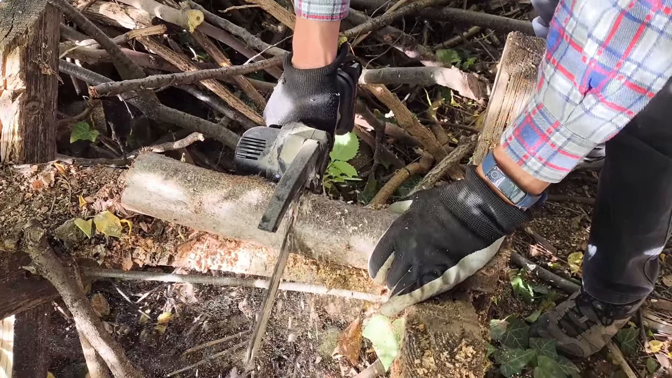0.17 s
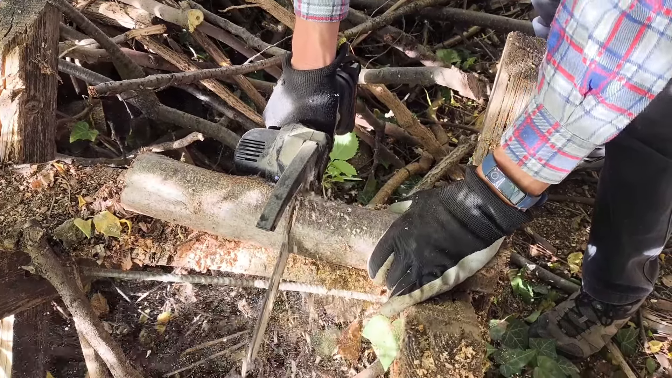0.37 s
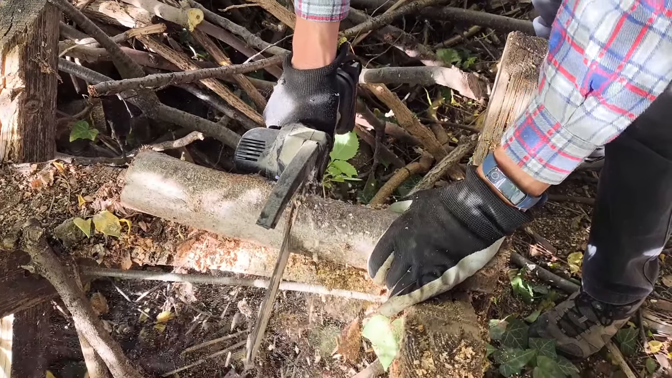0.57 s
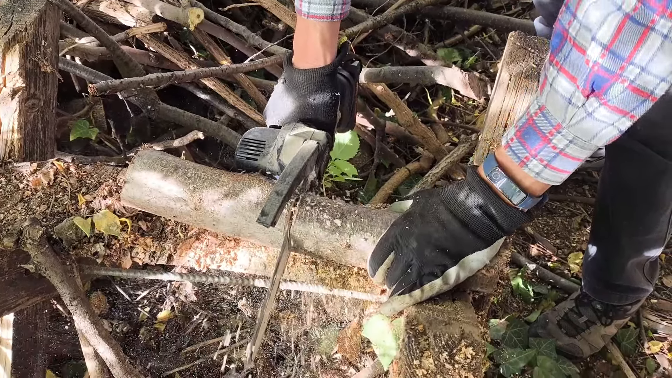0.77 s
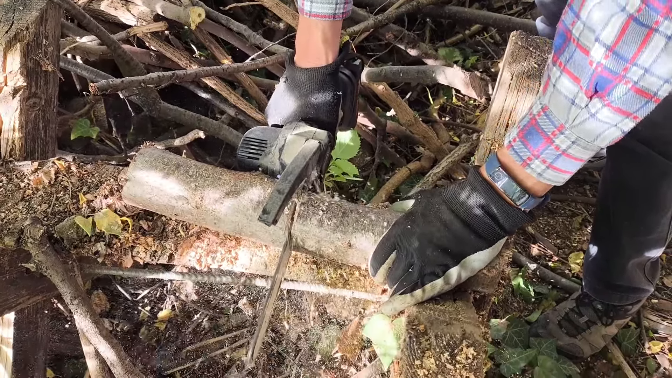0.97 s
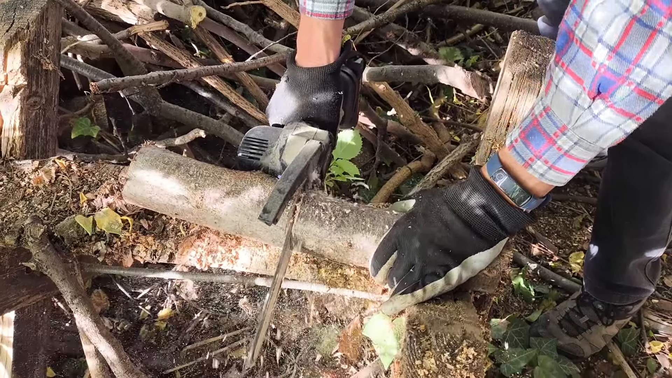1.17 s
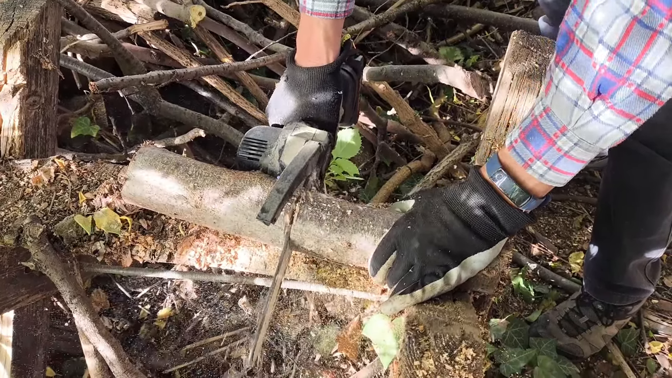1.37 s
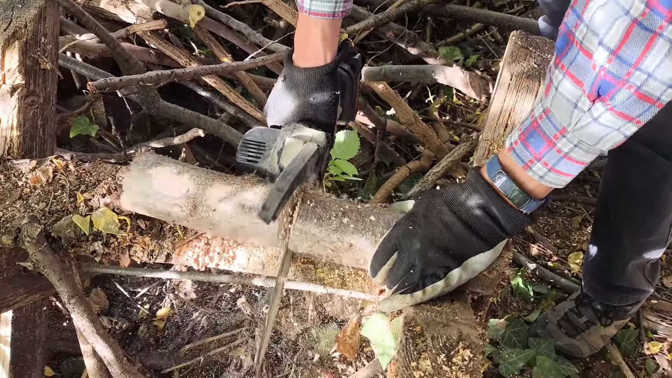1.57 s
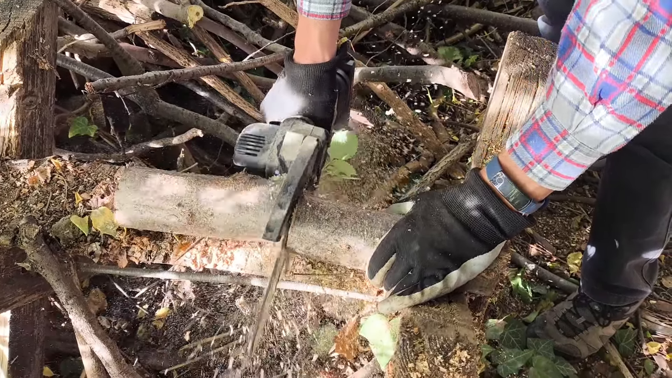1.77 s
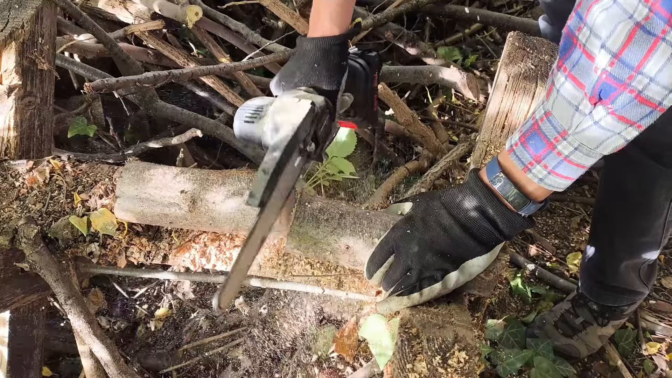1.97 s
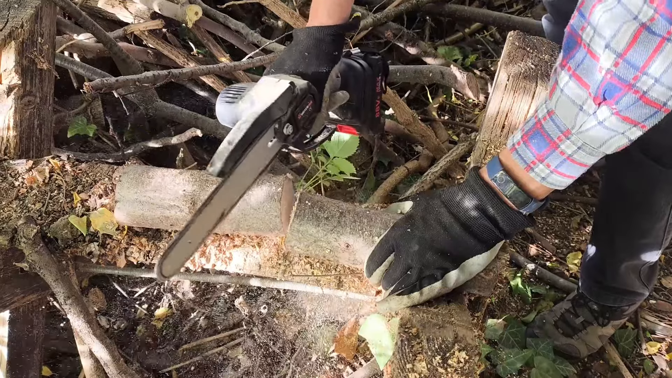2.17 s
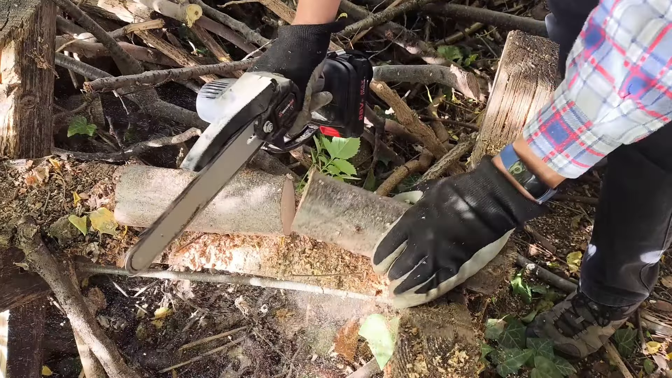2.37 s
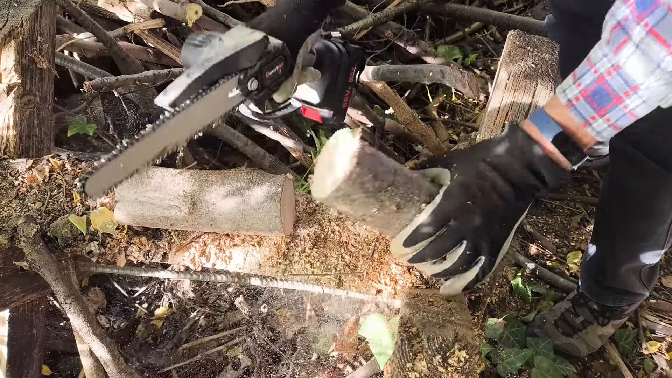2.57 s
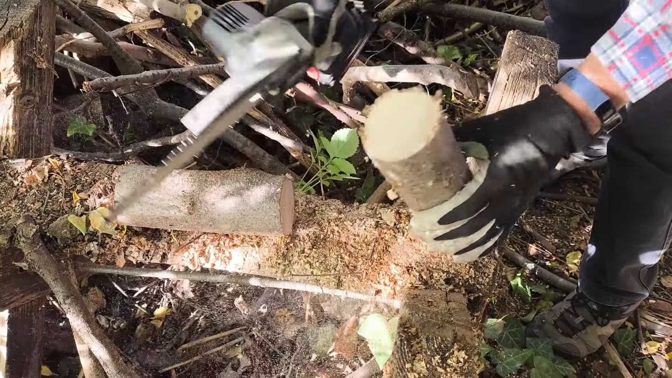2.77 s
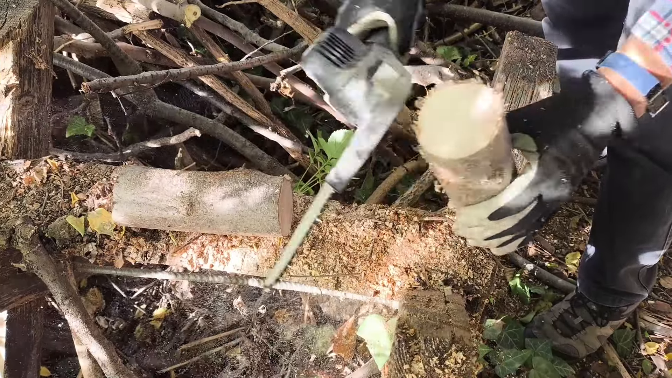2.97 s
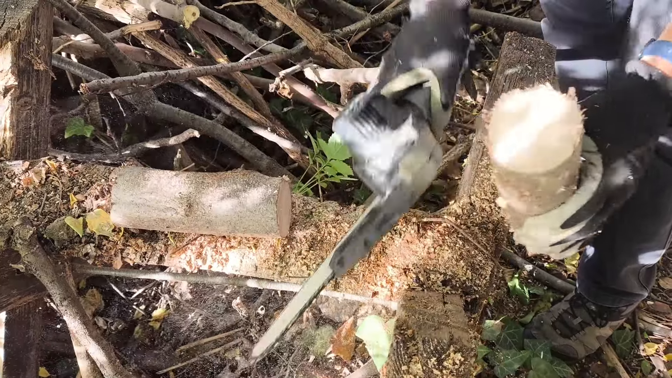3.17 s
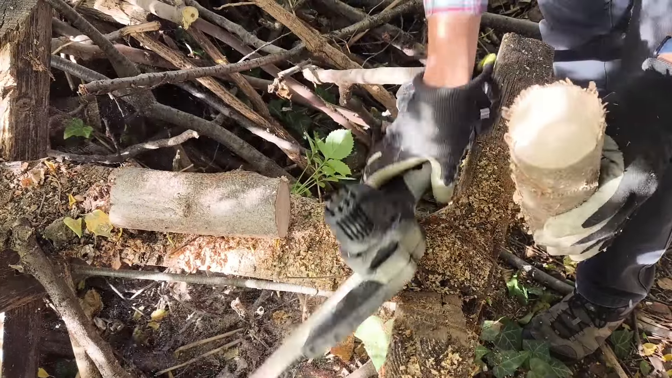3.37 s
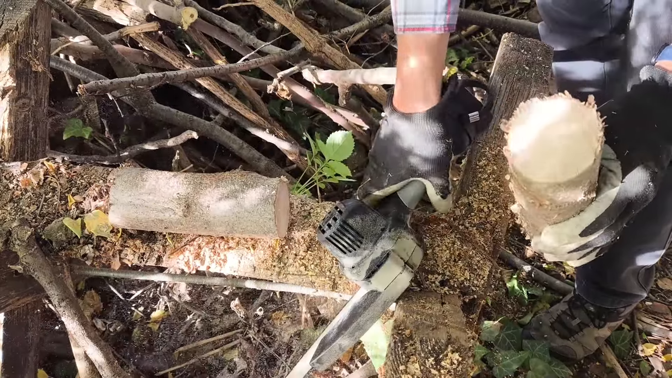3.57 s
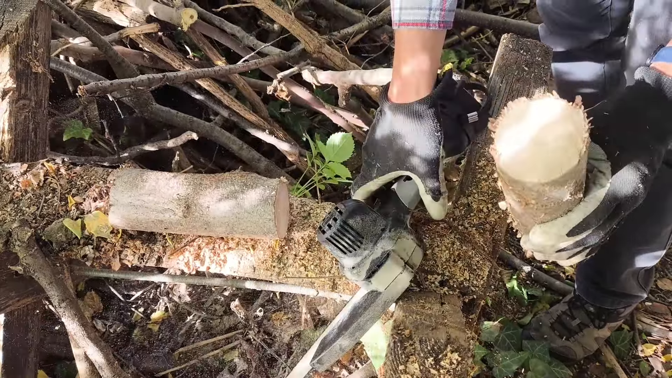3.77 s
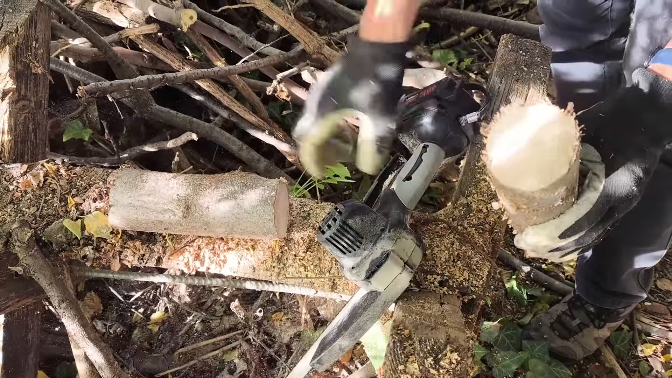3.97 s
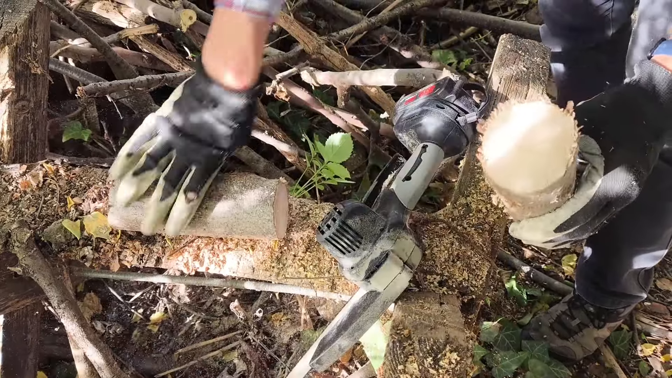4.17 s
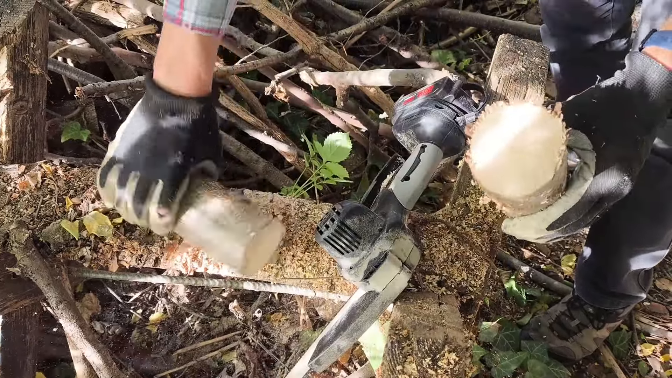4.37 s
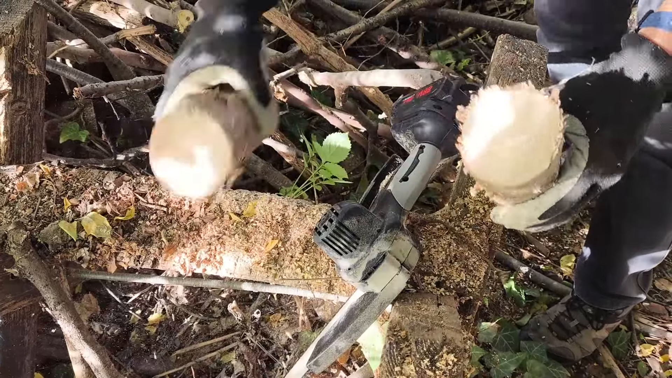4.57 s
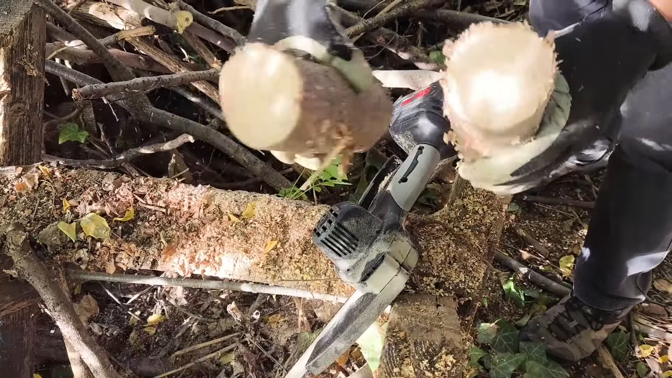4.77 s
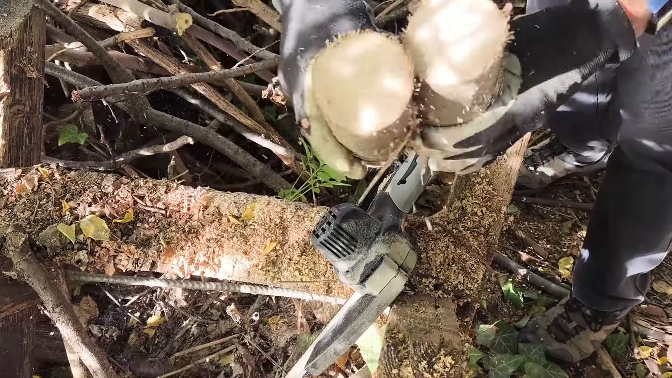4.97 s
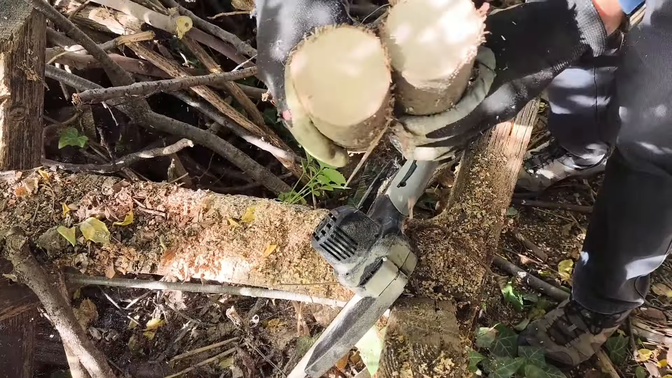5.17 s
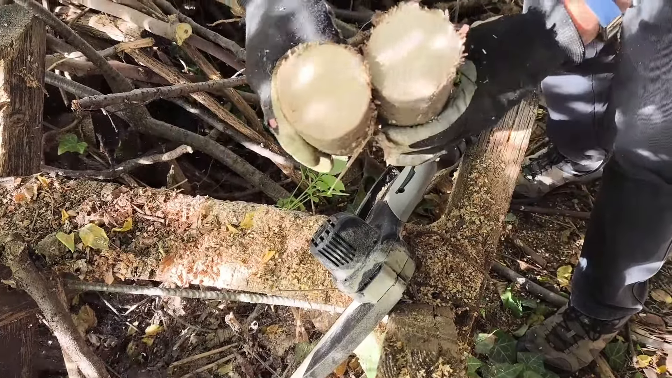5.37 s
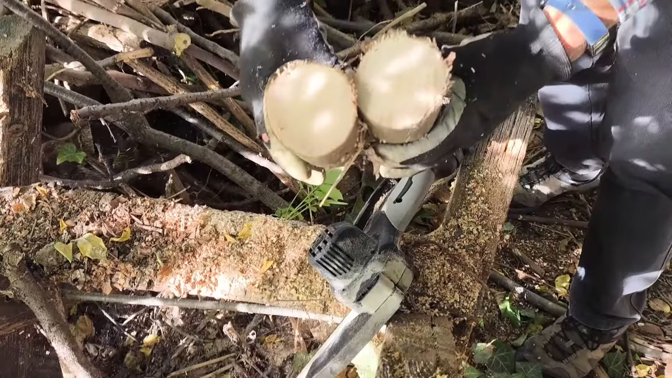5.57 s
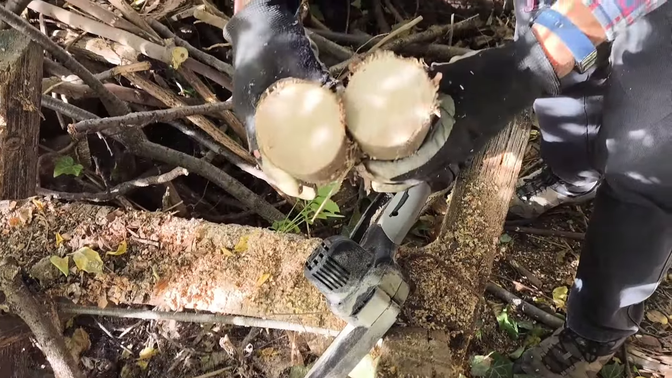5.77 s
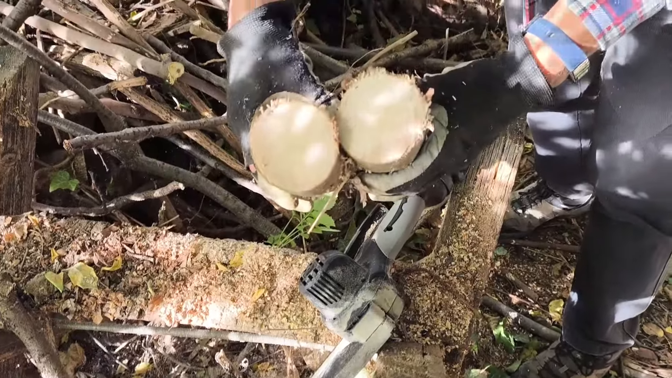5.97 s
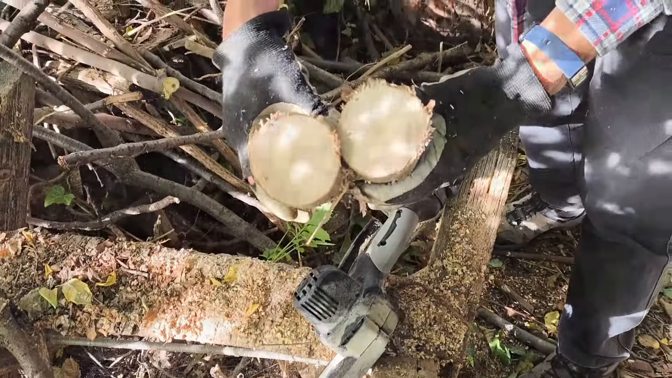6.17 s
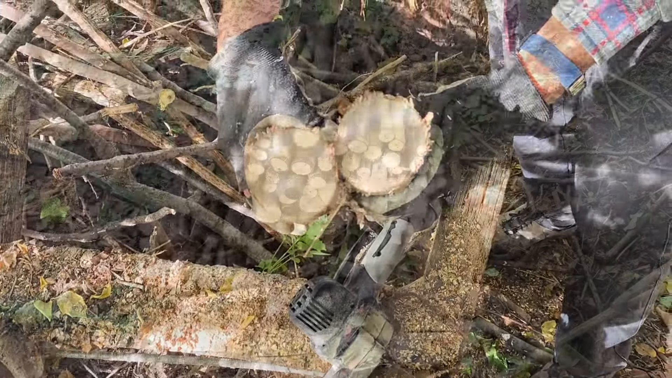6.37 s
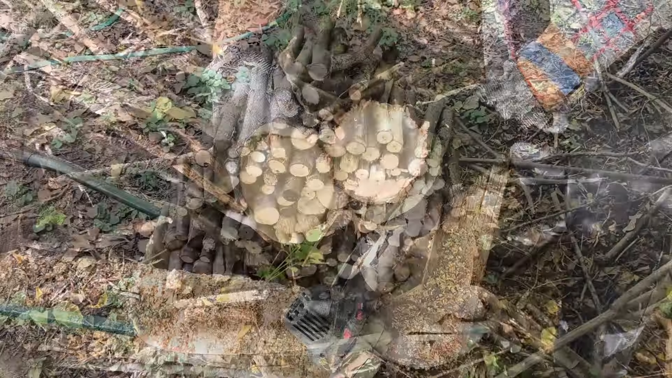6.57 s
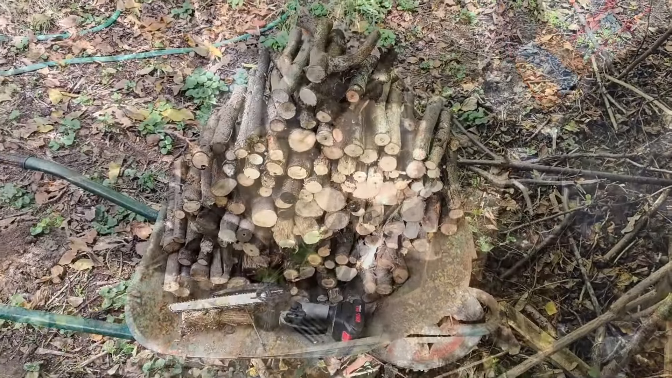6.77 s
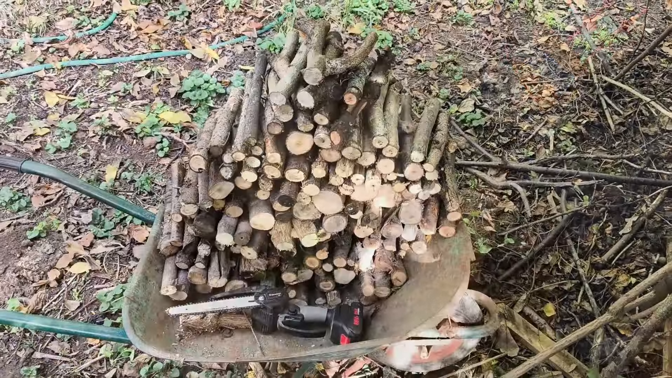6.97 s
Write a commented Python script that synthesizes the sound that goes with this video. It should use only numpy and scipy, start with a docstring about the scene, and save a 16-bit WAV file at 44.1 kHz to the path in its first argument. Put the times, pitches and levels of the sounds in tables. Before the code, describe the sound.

From 0 to 1.7 seconds a small battery chainsaw cuts a branch very close to the microphone: dense, hissy metallic chain rattle, hollow housing buzz, a low woody drone, and a shrill gear whine around 3 to 4 kHz that wavers, climbs towards 1 second and sags again. Around 1.55 to 1.8 the last fibres growl, groan and crack. The drone vanishes and the freed chain whirs, the whine darting upwards before vanishing near 2. The motor falls in pitch, the rattle breaking into slaps until about 2.7, ending in tiny ticks. Then a quiet garden with faint wash and hiss. At 3.5 the saw is laid down with a clustered clatter and thud; low hum comes and goes. Gloves rustle and bark snaps around 4 to 4.7. At 5.03 two logs knock together, with faint taps at 6.2 and 6.6. A soft mid rumble swells from 6.5 to the end.

```python
"""A small battery chainsaw finishes a cut close to the microphone: separate noises with shared gusts and clicks
stand for the links shaking bar, housing and branch, wavering sines for gears and motor. The last fibres growl
and crack, then the chain runs free and coasts to a stop with single slaps and ticks. In the quiet garden
(filtered noise and a low hum) gloves rustle in grains of noise, the saw is laid down with ringing bursts and
a thud, two logs knock together in the same way, and a mid rumble swells at the very end."""
import sys
import numpy as np
from scipy import signal
from scipy.io import wavfile
from scipy.ndimage import uniform_filter1d

SR = 44100
rng = np.random.default_rng(int(sys.argv[2]) if len(sys.argv) > 2 else 0)


def to_wav(sig):
    """Store sig (one row per channel, or 1-D mono) as 16-bit WAV at the path in sys.argv[1].

    Samples outside -1..1 are clipped; the rate is SR.
    """
    pcm = np.clip(np.atleast_2d(sig), -1, 1) * 32767
    pcm = np.round(pcm).astype(np.int16)
    wavfile.write(sys.argv[1], SR, pcm.T)  # frames by channels


N = 308782

# In every colour and resonance table the dB values are relative: body() evens out the total.

# Garden colours: (frequency [Hz], power per Hz [dB])
WASH_COLOUR = [(30, -50.5), (96, -9), (125, -8), (408, -9), (613, -14.5), (2500, -29.5), (3250, -57.5)]
HISS_COLOUR = [(1500, -20), (2500, -3), (6000, -3.5), (9000, -19), (16000, -9.5)]
# Times when the low hum comes and goes: (start [s], end [s], added at the peak [dB])
HUM_SWELLS = [(3.2, 4.4, 10.5), (5.198, 6.4, 13)]
WASH_DB, HISS_DB, HUM_REST_DB, HUM_HZ = -59, -71.5, -74, 91
WASH_SWELL_S, WASH_SWELL_DB_PER_S = 6.5, 17

# Faint fidgeting of gloves and sawdust: (time [s], level [dB])
FIDGETING = [(2.72, -58.5), (3.27, -67), (3.5, -57), (3.9, -70), (4.2, -60), (4.6, -67.5), (5.1, -67),
             (5.75, -69.5), (6.88, -78)]
# Strokes of a glove on bark: (start [s], length [s], starting level [dB])
STROKES = [(2.786, 0.15, -57), (3.526, 0.11, -51), (4.03, 0.041, -49.5), (4.287, 0.27, -51.5),
           (4.423, 0.066, -50), (4.648, 0.37, -60), (5.033, 0.063, -50), (6.903, 0.14, -66.5)]
# Bark and twigs snapping: (time [s], peak [dB], centre [Hz])
SNAPS = [(3.529, -26, 6100), (3.568, -29, 2060), (3.6646, -40, 8300), (3.9838, -44.5, 6030),
         (4.022, -39, 7200), (4.0453, -35.5, 3800), (4.3046, -31, 8280), (4.321, -31, 10800),
         (4.339, -36, 8500), (4.4179, -30, 10800), (4.43, -32, 11000), (4.957, -38, 9100),
         (5.3242, -43, 7360), (5.3652, -43, 6060), (5.4894, -44.5, 10600), (5.597, -42.5, 8740),
         (5.7224, -46, 7400), (6.23, -40, 2316), (6.599, -45, 7480)]
# Colour of the rustle: (frequency [Hz], power per Hz [dB])
RUSTLE_COLOUR = [(800, -12), (1900, -3), (3600, -8), (5200, -3.5), (9600, -1.5), (10800, -1), (12500, -8),
                 (16000, -6.5)]
# Its resonances: (frequency [Hz], width [Hz], level [dB])
RUSTLE_RINGS = [(5700, 900, -5), (8500, 300, 0.5), (10800, 430, -1)]
STROKE_ATTACK_S, STROKE_RELEASE_S, STROKE_FADE_DB = 0.0097, 0.033, -2.5
# Crumbs ticking: level above the rustle, which counts as -70 dB at most here
TICKS_PER_S, TICK_DB, TICK_SPREAD_DB, TICK_CAP_DB = 11, 25, 2, -70
TICK_LOW_HZ, TICK_HIGH_HZ = 6220, 11200

# Knocks and their bounces: (time [s], blow before ringing [dB], thud peak [dB], 0 = saw laid down, 1 = logs)
KNOCKS = [(3.464, -50, -43.5, 0), (3.527, -45, -35, 0), (3.536, -33, -28.5, 0), (3.545, -36.5, -53, 0),
          (3.56, -36, -37, 0), (3.599, -45, -50, 0), (5.032, -33, -60, 1), (5.042, -40, -50, 1),
          (5.052, -42, -47, 1), (5.079, -49, -50, 1), (6.229, -54, -70.5, 1), (6.604, -53.5, -52, 1)]
# Tones of the thud: (frequency [Hz], relative level [dB], time to fall 60 dB [s])
THUD_TONES = [(141, -6, 0.087), (253, 14, 0.035), (295, 10, 0.07)]
# What the blows ring with: (frequency [Hz], width [Hz], level [dB])
SAW_MODES = [(608, 150, 8), (1240, 340, -4), (1980, 1000, 0), (3800, 350, -4)]
LOG_MODES = [(680, 420, 2), (1000, 300, -2), (2000, 900, 1), (3040, 170, 0)]
# Woody colour shared by knocks and tearing fibres: (frequency [Hz], power per Hz [dB])
WOODY = [(300, -18), (600, 1.5), (5000, -15), (11000, -11), (16000, -38.5)]

# The branch drone's colour: (frequency [Hz], power per Hz [dB])
BRANCH_COLOUR = [(60, -33.5), (110, -18), (200, -11.5), (275, -5.5), (440, -7), (700, -11.5), (950, -32)]
# Its resonances: (frequency [Hz], width [Hz], level [dB])
BRANCH_RINGS = [(284, 41, 0), (537, 110, -7)]
# The branch groans as it gives way: (start [s], end [s], added at the peak [dB])
GROAN = (1.7, 2.1, 9.4)
# The last fibres tear with a growl: (start [s], end [s], level before ringing [dB], average clicks [per s])
TEARING = (1.55, 1.72, -25.5, 160)
# Fibres crack one by one: (time [s], level before a final halving [dB])
CRACKS = [(1.56, -1), (1.678, 1), (1.705, -2)]
# Resonances of the fibres: (frequency [Hz], width [Hz], level [dB])
FIBRE_RINGS = [(294, 90, 11.5), (560, 130, 10), (800, 67, 8.5)]
# The drone's level at the start, its softening, and its falling silent
BRANCH_DB, BRANCH_SAG_DB_PER_S, BRANCH_QUIT_S, BRANCH_QUIT_DB_PER_S = -29.5, 1.7, 1.8, 220

# Gear mesh tone, sagging under load: (time [s], frequency [Hz])
MESH_PITCH = [(0, 3050), (0.1, 3240), (0.2, 3040), (0.27, 3250), (0.33, 2960), (0.35, 3340), (0.45, 3300),
              (0.57, 3700), (0.66, 3770), (0.73, 4110), (0.745, 3830), (0.86, 4380), (0.9, 4200),
              (1.0, 4080), (1.11, 4330), (1.28, 3870), (1.3, 3620), (1.36, 4070), (1.41, 3700), (1.5, 3800),
              (1.55, 3640), (1.57, 3250), (1.61, 3540), (1.66, 3760), (1.75, 3920), (1.81, 4770),
              (1.99, 6650)]
# Its level before wavering and beating: (time [s], level [dB])
MESH_LEVEL = [(0.33, -32), (0.36, -27), (1.52, -26.5), (1.62, -30), (1.8, -30), (1.93, -25)]
# Motor shaft once it runs free: (time [s], speed and pitch [Hz], level before wavering [dB])
FREE_SHAFT = [(1.81, 385, -49.5), (1.88, 410, -38), (1.95, 384.5, -40.5), (2.03, 327.3, -39),
              (2.14, 269, -45.5), (2.24, 215, -65), (2.34, 163, -66)]
PINION_TEETH, STOP_S = 14, 2.78
LOW_WHINE_ORDER = 8.15  # vibrations a shaft turn

# Colours of bar and housing: (frequency [Hz], power per Hz [dB])
BAR_COLOUR = [(1650, -39), (2800, -14), (3760, -7), (5170, -8.5), (7360, -6.5), (10400, -1), (12900, -11.5),
              (14300, -9.5), (15700, -8.5)]
HOUSING_COLOUR_IN_WOOD = [(320, -36), (550, -13.5), (756, -4), (919, -7.5), (2100, 0.5), (3100, -15),
                          (4030, -44)]
HOUSING_COLOUR_FREE = [(88, -48.5), (150, -23), (435, -10.5), (731, -2), (884, -14), (1800, -0.5),
                       (3100, -11), (4030, -38)]
# Their resonances: (frequency [Hz], width [Hz], level [dB])
BAR_RINGS_IN_WOOD = [(5670, 110, -4), (6504, 640, -5), (7386, 140, 2), (8300, 57, -5.5), (10090, 660, -5),
                     (10820, 400, -0.5), (14400, 910, -11)]
BAR_RINGS_FREE = [(6220, 1400, -1), (7400, 310, -3.5), (8460, 220, 0.5), (9720, 860, 4.5), (10600, 500, 3)]
HOUSING_RINGS_IN_WOOD = [(752, 95, 1.5), (1489, 120, -3.5), (1795, 200, -5)]
HOUSING_RINGS_FREE = [(590, 90, -5), (732, 42, 0.5), (1330, 43, -10), (1820, 130, -0.5), (2370, 200, -3)]
# Sharp blows of the chain on bar and housing, bites in the cut, then slaps in free air;
# levels before ringing: (time [s], bar [dB], housing before blunting [dB])
CHAIN_BLOWS = [(1.26, -25, -14), (1.282, -21, -15.5), (1.74, -15, -16), (1.774, -12, -14),
               (1.836, -18, -22), (2.112, -12, -25), (2.123, -22, -21), (2.184, -12.5, -38),
               (2.225, -28, -24), (2.254, -17, -42), (2.284, -16, -29), (2.372, -24, -31.5),
               (2.44, -29, -47), (2.3185, -15, -25.5), (2.347, -19, -26), (2.3939, -19.5, -31),
               (2.479, -22.5, -30), (2.5423, -26.5, -30.5), (2.559, -34, -33), (2.6094, -30, -48),
               (2.692, -38, -45), (2.652, -44, -41)]
# The last cogs tick over as the motor stops: (time [s], level before ringing [dB])
COGS = [(2.7275, -36), (2.743, -33), (2.756, -37), (2.7664, -36), (2.7794, -44)]
# Their colour: (frequency [Hz], power per Hz [dB])
COG_COLOUR = [(400, -13), (700, -2.5), (1400, -9), (2000, -16), (3000, -22), (6500, -17), (9000, -17),
              (11000, -45)]
# The rattle swells briefly: (start [s], end [s], added to the bar [dB], added to the housing [dB])
SURGE = (2.095, 2.15, 3.501, 6)
BREAKTHROUGH_S, RATTLE_END_S = 1.754, 2.74
# In the cut the chain grows louder as the bar sinks in; the housing follows the speed
CUT_BAR_DB, SINK_DB_PER_S, CUT_HOUSING_DB, CUT_POWER, CUT_TURNS_PER_S = -17, 1.23, -23.5, 0.91, 266
# In free air both fall as a power of the speed once it drops under the knee
FREE_BAR_DB, FREE_HOUSING_DB, BAR_POWER, HOUSING_POWER, KNEE_TURNS_PER_S = -17, -28.5, 1.665, 1.29, 337

EDGE_HZ = 15720  # upper edge of the finished sound


def gain_of(db):
    """Turn decibels into a plain multiplier."""
    return 10 ** (np.asarray(db) / 20)


def evened(x):
    """Scale a signal to an average power of 1."""
    return x / np.sqrt(np.mean(x ** 2) + 1e-20)


def curves(rows):
    """Read every column of a table at each sample, with straight lines between rows."""
    s, *columns = np.transpose(rows)
    return [np.interp(np.arange(N) / SR, s, c) for c in columns]


def add(mix, s, sound):
    """Mix a short sound in at a time in seconds."""
    part = mix[round(s * SR):][:len(sound)]
    part += sound[:len(part)]


def body(spectrum, rings=(), rings_db=0):
    """How a thing answers a tap: a broad colour with resonances on top, scaled to unit energy."""
    hz = np.fft.rfftfreq(8192, 1 / SR)
    f, db = np.transpose(spectrum)
    colour_db = np.interp(np.log(hz + 1), np.log(f + 1), db, -80, -80)
    power = gain_of(colour_db) ** 2
    for centre, width, ring_db in rings:
        power = power + gain_of(ring_db + rings_db) ** 2 / (1 + (2 * (hz - centre) / width) ** 2) ** 2
    # minimum phase: the answer starts at the tap, never before it
    log_gain = np.log(power + 1e-9) / 2
    circle = np.concatenate([log_gain, log_gain[-2:0:-1]])
    taps = np.fft.ifft(np.exp(np.conj(signal.hilbert(circle)))).real[:4096]
    return taps / np.linalg.norm(taps)


def through(x, taps):
    """Let a sound ring through a body."""
    return signal.oaconvolve(x, taps)[:N]


def random_sizes(spread_db):
    """Random strengths, a few far from the rest."""
    return gain_of(spread_db * np.minimum(rng.exponential(1, N), 4))


def clicks(per_s, spread_db, t60):
    """Random short noise bursts of uneven size; average power near 1 whatever the rate."""
    chance = np.clip(per_s / SR, 1e-4, 1)
    struck = evened(random_sizes(spread_db)) * (rng.random(N) < chance) / np.sqrt(chance)
    fade = gain_of(-60 * np.arange(800) / SR / t60)
    return through(struck, fade / np.linalg.norm(fade)) * rng.standard_normal(N)


def wander(seconds):
    """Smooth random drift, made by averaging noise twice."""
    size = round(seconds * SR)
    return evened(uniform_filter1d(uniform_filter1d(rng.standard_normal(N), size), size))


def burst(t60, size):
    """A noise burst that falls 60 dB in t60 seconds."""
    return rng.standard_normal(size) * gain_of(-60 * np.arange(size) / SR / t60)


def ring(modes):
    """Fading sines started together with a soft attack, scaled to a peak of 1."""
    t = np.arange(6000) / SR
    sound = np.zeros(len(t))
    for hz, db, t60 in modes:
        sound += gain_of(db - 60 * t / np.clip(t60, .01, .12)) * np.sin(2 * np.pi * hz * t)
    sound = sound * np.minimum(t / 0.0024, 1)
    return sound / abs(sound).max()


def tone(hz, db, flutter, flutter_db):
    """A sine that wavers in pitch and level."""
    phase = 2 * np.pi * np.cumsum(hz * (1 + flutter * wander(.006))) / SR
    return np.sin(phase) * np.sqrt(2) * gain_of(db + flutter_db * wander(0.013))


def shimmer(x, depth_db):
    """Resonances swell and fade in random drifting patches of time and pitch."""
    z = signal.stft(x, nperseg=512)[2]
    patches = rng.standard_normal(z.shape[::-1])
    patches = uniform_filter1d(patches, size=9, axis=0)  # smooth in time
    patches = uniform_filter1d(patches, size=3, axis=1)  # smooth in pitch
    return signal.istft(z * gain_of(depth_db * evened(patches).T), nperseg=512)[1][:N]


def swell(start, end, sharpness):
    """Rises from 0 to 1 and falls again between two times."""
    progress = np.clip((np.arange(N) / SR - start) / (end - start), 0, 1)
    return np.sin(np.pi * progress) ** np.clip(sharpness, .1, 4)


def garden():
    """Distant wash and faint hiss are coloured noise; the hum is a sine wavering in pitch."""
    swell_db = WASH_SWELL_DB_PER_S * np.maximum(np.arange(N) / SR - WASH_SWELL_S, 0)
    wash = through(rng.standard_normal(N) * gain_of(WASH_DB + 1.6 * wander(0.033)), body(WASH_COLOUR))
    # a mid rumble swells at the end
    rumble = np.diff(uniform_filter1d(wash, size=36), prepend=0) * 20
    wash += (gain_of(swell_db) - 1) * rumble
    hum_db = HUM_REST_DB + sum(db * swell(start, end, sharpness=0.38) for start, end, db in HUM_SWELLS)
    hum_phase = 2 * np.pi * np.cumsum(HUM_HZ * (1 + 0.026 * wander(0.05))) / SR
    hiss = gain_of(HISS_DB) * through(rng.standard_normal(N), body(HISS_COLOUR))
    return wash + np.sin(hum_phase) * gain_of(hum_db) + hiss


def strokes():
    """Rustle level: constant fidgeting, and strokes that start quickly, fade and let go."""
    power = gain_of(curves(FIDGETING)[0]) ** 2 * (np.arange(N) > FIDGETING[0][0] * SR)
    for s, length, db in STROKES:
        t = np.arange(0, length, 1 / SR)
        edges = np.clip(np.minimum(t / STROKE_ATTACK_S, (length - t) / STROKE_RELEASE_S), 0, 1)
        add(power, s, (edges * gain_of(db + STROKE_FADE_DB * t / length)) ** 2)
    return np.sqrt(power)


def ticks(level):
    """Tiny random ticks of crumbs and bark, each a short roughened ring at one of eight pitches."""
    out, t = np.zeros(N), np.arange(300) / SR
    size = level * gain_of(TICK_DB) * random_sizes(TICK_SPREAD_DB) * (rng.random(N) < TICKS_PER_S / SR)
    kind = rng.integers(0, 8, N)
    for k, hz in enumerate(np.geomspace(TICK_LOW_HZ, TICK_HIGH_HZ, 8)):
        envelope = gain_of(-60 * t / .012) * np.minimum(t / .0004, 1)
        roughness = uniform_filter1d(rng.standard_normal(300), size=16)
        out += through(size * (kind == k), envelope * np.sin(2 * np.pi * hz * t) * roughness)
    return out


def gloves():
    """Clumped grains of friction, ticking crumbs, and single snaps with a colour of their own."""
    level = strokes()
    grains = 0.9 * rng.standard_normal(N) * gain_of(2.0 * wander(0.0089))
    grains += .18 * clicks(110, spread_db=-2.0, t60=0.0053)
    out = shimmer(through(grains * level, body(RUSTLE_COLOUR, RUSTLE_RINGS)), depth_db=1.5)
    out += ticks(np.minimum(level, gain_of(TICK_CAP_DB)))
    for s, peak_db, hz in SNAPS:
        snap_body = body(RUSTLE_COLOUR, RUSTLE_RINGS + [(hz, .3 * hz, 0)], rings_db=5)[:400]
        snap = np.convolve(burst(.018, size=1000), snap_body)
        add(out, s, gain_of(peak_db) * snap / abs(snap).max())
    return out


def knocks():
    """A short crack rings the struck thing; the trunk below adds a thud."""
    blows, thuds, thud = np.zeros((2, N)), np.zeros(N), ring(THUD_TONES)
    for s, blow_db, thud_db, thing in KNOCKS:
        add(blows[round(thing)], s, gain_of(blow_db) * burst(0.04, size=3000))
        add(thuds, s, gain_of(thud_db) * thud)
    return through(blows[0], body(WOODY, SAW_MODES)) + through(blows[1], body(WOODY, LOG_MODES)) + thuds


def levels(t, turns_per_s, free):
    """Bar, housing and branch in dB, from the time in the cut and the speed."""
    slowed_db = 20 * np.log10(np.clip(turns_per_s / KNEE_TURNS_PER_S, 1e-3, 1))
    surge = swell(*SURGE[:2], sharpness=1.0)
    cut_bar = CUT_BAR_DB + SINK_DB_PER_S * t
    cut_housing = CUT_HOUSING_DB + CUT_POWER * 20 * np.log10(turns_per_s / CUT_TURNS_PER_S)
    free_bar = FREE_BAR_DB + BAR_POWER * slowed_db + SURGE[2] * surge
    free_housing = FREE_HOUSING_DB + HOUSING_POWER * slowed_db + SURGE[3] * surge
    bar = (1 - free) * cut_bar + free * free_bar
    housing = (1 - free) * cut_housing + free * free_housing
    branch = BRANCH_DB - BRANCH_SAG_DB_PER_S * t + GROAN[2] * swell(*GROAN[:2], sharpness=0.4)
    return bar, housing, branch - BRANCH_QUIT_DB_PER_S * np.maximum(t - BRANCH_QUIT_S, 0)


def chain_rattle(turns_per_s, free):
    """Separate sliding noises for bar, housing and branch, with shared gusts and sharper link impacts."""
    sliding = rng.standard_normal((3, N)) * gain_of(0.78 * wander(0.0027) + 0.78 * wander(0.12))
    # the slower the free chain, the more its rattle falls apart into jolts
    slowness = np.clip(1 - turns_per_s / KNEE_TURNS_PER_S, 0, 1)
    sliding *= gain_of(4.5 * slowness * free * wander(.005))
    impacts = clicks(1.3 * turns_per_s, spread_db=2.0, t60=0.005)
    impacts *= np.sqrt(np.clip(turns_per_s / 250, 0, 1))  # slower links hit more softly
    sharp_impacts = np.sqrt(2) * np.gradient(impacts)
    return 1.204 * sliding + np.array([.55 * sharp_impacts, .4 * impacts, .15 * impacts])


def chain_blows():
    """The chain bites in the cut, then slaps in free air, as noise bursts; the housing's are blunter."""
    bar_blows, housing_blows = np.zeros((2, N))
    for s, bar_db, housing_db in CHAIN_BLOWS:
        add(bar_blows, s, gain_of(bar_db) * burst(0.041, size=2000))
        add(housing_blows, s, gain_of(housing_db) * burst(.03, size=2000))
    return bar_blows, 1.4 * uniform_filter1d(housing_blows, size=10)


def last_cogs():
    """The last cogs tick over as short noise bursts ringing the housing."""
    blows = np.zeros(N)
    for s, db in COGS:
        add(blows, s, gain_of(db) * burst(0.03, size=2000))
    return through(blows, body(COG_COLOUR, HOUSING_RINGS_FREE[1:4], rings_db=-2.0))


def breaking_fibres():
    """Rapid clicks through woody resonances make a tearing growl; single taps make the cracks."""
    growl = gain_of(TEARING[2]) * swell(*TEARING[:2], sharpness=.4)
    out = through(growl * clicks(TEARING[3], spread_db=1.0, t60=.03), body(WOODY, FIBRE_RINGS))
    crack = np.convolve(np.hanning(10), body(WOODY, FIBRE_RINGS, rings_db=-13)) / 2
    for s, db in CRACKS:
        add(out, s, -gain_of(db) * crack)
    return out


def gear_whine(t, mesh_hz, turns_per_s, free):
    """Meshing teeth whine at tooth rate, with a lower whine tied to the shaft speed."""
    # the mesh tone breaks up as teeth bite and let go
    mesh = tone(mesh_hz, curves(MESH_LEVEL)[0], .017 + .012 * free, flutter_db=3)
    mesh *= np.clip((MESH_PITCH[-1][0] - t) / .05, 0, 1)
    # an uneven pinion beats once a turn, so side strands come and go around the tone
    mesh *= 1 + .75 * wander(.04) * np.cos(2 * np.pi * np.cumsum(mesh_hz / PINION_TEETH) / SR)
    # the lower whine sounds only near a housing resonance, and only until the branch groans
    low_hz = LOW_WHINE_ORDER * turns_per_s
    near_resonance = 1 / (1 + ((low_hz - 2470) / 140) ** 4)
    low_whine = tone(low_hz, -29, 0.017, flutter_db=3.5) * near_resonance * (t < GROAN[0])
    return mesh + low_whine


def saw():
    """Links and teeth, paced by the shaft speed, shake bar, housing and branch while gears and motor sing."""
    t = np.arange(N) / SR
    mesh_hz = curves(MESH_PITCH)[0]
    shaft_hz, shaft_db = curves(FREE_SHAFT + [(STOP_S, 10, -90)])
    turns_per_s = np.where(t < FREE_SHAFT[0][0], mesh_hz / PINION_TEETH, shaft_hz)
    running = np.clip((RATTLE_END_S - t) / 0.037, 0, 1)
    free = np.clip((t - BREAKTHROUGH_S) / 0.29, 0, 1)  # 0 = in the cut, 1 = in free air
    in_wood, in_air = (1 - free) ** 0.5, free ** 1.5 * running
    bar_db, housing_db, branch_db = levels(t, turns_per_s, free)
    rattle = chain_rattle(turns_per_s, free) * gain_of([bar_db, housing_db, branch_db])
    bar_blows, housing_blows = chain_blows()
    bar = through(rattle[0] * in_wood, body(BAR_COLOUR, BAR_RINGS_IN_WOOD))
    bar += through(rattle[0] * in_air + bar_blows, body(BAR_COLOUR, BAR_RINGS_FREE))
    housing = through(rattle[1] * in_wood, body(HOUSING_COLOUR_IN_WOOD, HOUSING_RINGS_IN_WOOD))
    housing += through(rattle[1] * in_air + housing_blows, body(HOUSING_COLOUR_FREE, HOUSING_RINGS_FREE))
    housing += last_cogs()
    branch = through(rattle[2], body(BRANCH_COLOUR, BRANCH_RINGS)) + breaking_fibres()
    # the shaft throbs roughly in the wood and more cleanly in free air
    throb = tone(turns_per_s, branch_db - 9.5, 0.036, flutter_db=4.5) * in_wood ** 4
    shaft = tone(shaft_hz, shaft_db, .022, flutter_db=3) * np.clip((t - FREE_SHAFT[0][0]) / .03, 0, 1)
    whine = gear_whine(t, mesh_hz, turns_per_s, free)
    return shimmer(bar + housing, depth_db=1.45) + branch + whine + throb + shaft


def scene():
    """Garden, gloves, knocks and saw together, as one channel."""
    return (garden() + gloves() + knocks() + saw())[None]


def record(dry):
    """A microphone without deep bass; peaks round off near full scale; then the top is cut off."""
    thinned = signal.sosfilt(signal.butter(2, 45, "high", fs=SR, output="sos"), dry)
    rounded = 0.95 * np.tanh(thinned / 1.167)
    band_limit = signal.firwin(511, EDGE_HZ, window=("kaiser", 9), fs=SR)
    return signal.oaconvolve(rounded, band_limit[None], "same")


dry = scene()
out = record(dry)
to_wav(out)
```